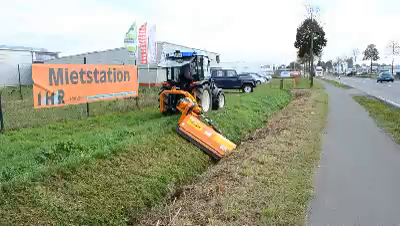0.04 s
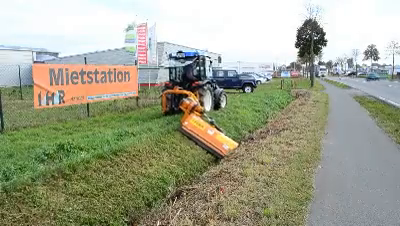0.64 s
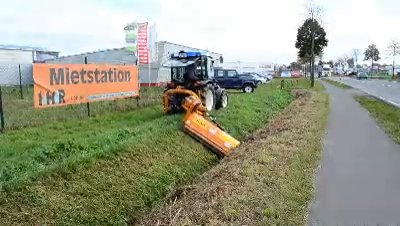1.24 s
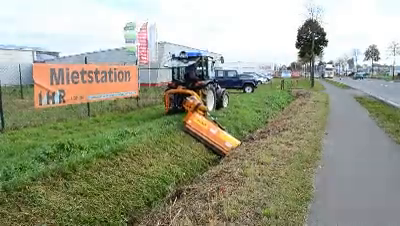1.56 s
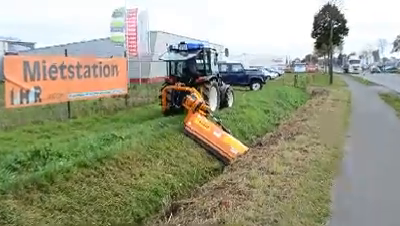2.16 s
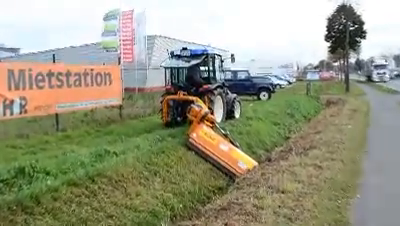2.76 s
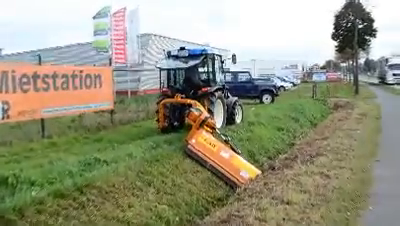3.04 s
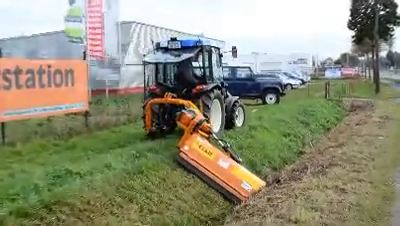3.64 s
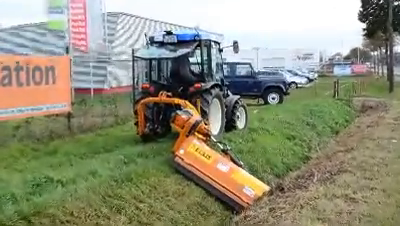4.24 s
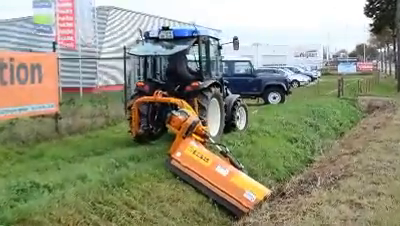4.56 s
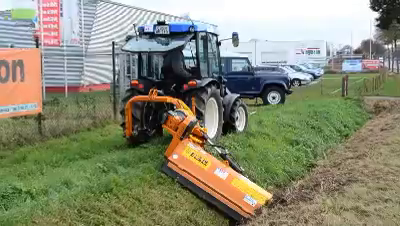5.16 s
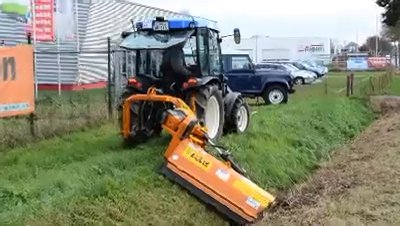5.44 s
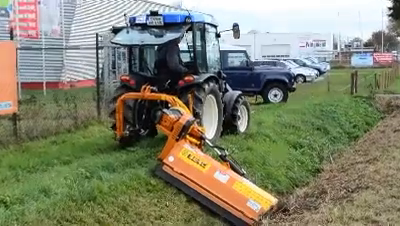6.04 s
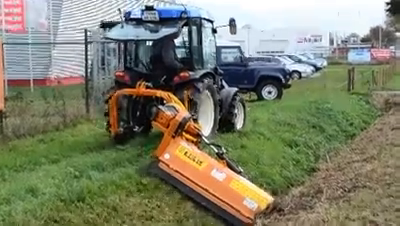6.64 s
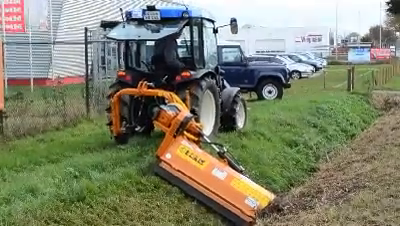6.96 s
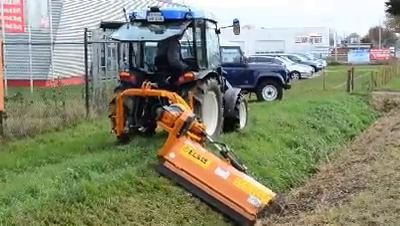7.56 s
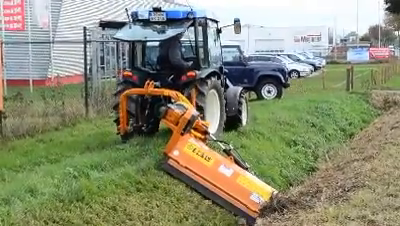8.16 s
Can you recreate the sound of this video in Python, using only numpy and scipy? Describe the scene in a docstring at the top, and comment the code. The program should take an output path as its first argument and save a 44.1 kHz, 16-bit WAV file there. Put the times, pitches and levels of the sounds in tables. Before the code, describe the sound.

A diesel tractor driving a flail mower fades in during the first half second and runs at an almost constant speed throughout, outdoors beside a road. Its low, pulsing drone carries light engine clatter and a thin gear and pump whine. Cut grass hisses and crackles faintly, and twigs give small sharp snaps from about 0.7 to 6 seconds. From around 3 seconds several cars pass with soft swells of tyre noise. Light wind puffs on the microphone between 4 and 6 seconds, while stalks scrape faintly in the mower. From about 6.5 to 8 seconds a lorry passes, the loudest event, with tyre roar, rumble, and an exhaust note and whine that fall in pitch; the mower dips slightly beneath it. Around 8 seconds sticks and clods clatter briefly against the steel hood, with one more wind puff as the drone continues.

```python
"""A diesel tractor fades in, mowing a ditch with a flail mower at a governed, almost steady speed.
The rotor's drone beats against the engine, a pump and a gearbox whine, grass hisses and twigs snap.
From about 3 s cars pass on the road alongside; from 4 s a little wind puffs on the microphone.
Near 7 s a lorry goes by with tyre roar, exhaust and axle whine, and the gain control ducks the mower.
Around 8 s sticks and clods rattle through the steel hood."""
import sys
import numpy as np
from scipy import signal
from scipy.fft import rfft, irfft
from scipy.io import wavfile
from scipy.ndimage import uniform_filter1d, minimum_filter1d

SR = 44100
rng = np.random.default_rng(int(sys.argv[2]) if len(sys.argv) > 2 else 0)


def put_to_file(sound):
    """Save the sound as 16-bit audio at rate SR, in the file named by the first command-line argument."""
    columns = np.atleast_2d(sound).T  # one column per channel
    safe = np.clip(columns, -1, 1)
    whole_steps = np.round(safe * 32767)
    wavfile.write(sys.argv[1], SR, whole_steps.astype(np.int16))


N = 365588
T = np.arange(N) / SR


def amp(db):
    """Decibels to gain."""
    return 10 ** (np.asarray(db) / 20)


def unit(x):
    """Scales to rms 1."""
    return x / np.sqrt(np.mean(x ** 2) + 1e-20)


def curve(rows):
    """Interpolates (time_s, value) rows per sample."""
    return np.interp(T, *np.transpose(rows))


def colour(x, points):
    """Filters x by a (freq_hz, level_db) spectrum, rolling off past its ends; rms 1."""
    hz, db = np.transpose(points)
    log_f = np.log(np.fft.rfftfreq(len(x), 1 / SR) + 1)
    beyond = np.maximum(log_f - np.log(hz.max()), 0) + np.maximum(np.log(hz.min()) - log_f, 0)
    gain = amp(np.interp(log_f, np.log(hz), db) - 20 * beyond)
    return unit(irfft(rfft(x) * gain, len(x)))


def noise(size=N):
    """White noise."""
    return rng.standard_normal(size)


def wander(rate_hz):
    """Random drift of rms 1, low-passed at rate_hz."""
    size = 2048
    freq_hz = np.fft.rfftfreq(size, T[-1] / size)
    slow = irfft(rfft(noise(size)) / (1 + (freq_hz / rate_hz) ** 4))
    return np.interp(T, np.linspace(0, T[-1], size), unit(slow))


def grains(per_s, spread_db):
    """Random impacts of unequal size; rms 1."""
    size = amp(spread_db * np.minimum(rng.exponential(1, N), 5))
    return unit(size * np.sign(noise()) * (rng.random(N) < per_s / SR))


def hump(centre_s, half_s):
    """Gaussian rise and fall of height 1."""
    return np.exp(-((T - centre_s) / half_s) ** 2)


def swells(rows):
    """Joint gain of (centre_s, half_s, level_db) humps, summed in power."""
    return np.sqrt(sum((amp(db) * hump(s, half_s)) ** 2 for s, half_s, db in rows))


def partials(turns, orders, waver, waver_hz):
    """(order, level_db) tones of a turning part, each wavering in level and phase."""
    out = np.zeros(N)
    for order, db in orders:
        phase = 2 * np.pi * (order * turns + rng.random())
        in_phase = np.cos(phase) * (1 + waver * wander(waver_hz))
        quadrature = np.sin(phase) * waver * wander(waver_hz)
        out += amp(db) * unit(in_phase + quadrature)
    return out


def shaft_turns(hz):
    """Revolutions of a shaft; all shafts follow one governed speed."""
    speed = [(.6, 1.0115), (1.05, .9985), (3.2, .9951), (3.9, .9988), (4.45, .9983), (5.1, .9945),
             (6.3, .9967), (7.4, .9972), (8.0, .994)]  # time_s, speed_factor
    return hz * np.cumsum(curve(speed)) / SR


def doppler_turns(hz, closest_s, pass_s, mach):
    """Cycles heard from a passing tone: sharp as it comes, flat as it goes."""
    receding = (T - closest_s) / np.hypot(pass_s, T - closest_s)
    return np.cumsum(hz * (1 - mach * receding)) / SR


def passing(peak_s, pass_s, db):
    """Gain of a passing source; in pass_s it travels as far as the road is from the microphone."""
    fall_db_per_decade = 41
    distance = np.hypot(1, (T - peak_s) / pass_s)
    return amp(db - fall_db_per_decade * np.log10(distance))


def wind():
    """Lumpy low buffeting of the microphone, in a few puffs."""
    gusts = [(4.15, 0.33, -32), (4.88, 0.11, -27.5), (5.33, .1, -30), (5.95, .25, -35), (8.22, 0.072, -25)]  # centre_s, half_s, level_db
    buffet_spectrum = [(20, -22), (50, -11), (100, -6.5), (190, -3.5), (300, -9.5), (500, -22.5),
                       (1200, -45)]  # freq_hz, level_db
    return swells(gusts) * amp(5.2 * wander(17)) * colour(noise(), buffet_spectrum)


def tyres():
    """Tyre roar swells as each vehicle passes; tread hiss is thrown ahead of it."""
    passes = [(2.82, 0.29, -26, -34), (3.37, 0.26, -28.5, -41), (4.15, 0.63, -28, -31),
              (5.08, 0.41, -25, -33), (5.42, 0.18, -21, -31), (6.38, 0.17, -28, -23),
              (6.8, 0.4, -11.5, -19), (7.38, 0.37, -8.5, -25), (7.87, 0.12, -16, -34)]  # cars, then lorry axles: closest_s, pass_s, roar_db, tread_db
    roar_spectrum = [(40, -18), (100, -10), (200, -4), (420, -8.5), (600, -4), (800, 0), (1020, -1),
                     (1250, -7), (1600, -13), (2000, -20.5), (3000, -27.5), (4200, -35), (6000, -54),
                     (12000, -62)]  # freq_hz, level_db
    tread_spectrum = [(800, -24), (1150, 0), (1330, -2), (1550, -6), (1850, -15.5), (2300, -19),
                      (3500, -35)]  # freq_hz, level_db
    lead = 0.3  # share of pass_s
    roar = np.sqrt(sum(passing(s, pass_s, db) ** 2 for s, pass_s, db, _ in passes))
    tread = np.sqrt(sum(passing(s - lead * pass_s, pass_s, db) ** 2 for s, pass_s, _, db in passes))
    flutter = amp(wander(20))
    return flutter * (roar * colour(noise(), roar_spectrum) + tread * colour(noise(), tread_spectrum))


def car():
    """One car's exhaust note swells and drops in pitch going past."""
    closest_s, pass_s = 3.35, 0.56
    firing = doppler_turns(58, closest_s, pass_s, mach=0.04)
    return passing(closest_s, pass_s, db=-43.5) * partials(firing, [(1, 0)], waver=0.2, waver_hz=4)


def lorry():
    """Exhaust and rear-axle whine fall in pitch over a rumble; each faces the microphone in turn."""
    whine_surges = [(2, 6.64, 0.23, -17), (2, 7.03, 0.14, -11.5), (2, 7.48, .5, -21.5), (3, 6.78, 0.2, -16)]  # axle_order, peak_s, pass_s, level_db
    exhaust_orders = [(1, 2), (2, -12.5), (5, -5.5)]
    body_spectrum = [(60, -16.5), (200, -6.5), (285, 4), (400, -4.5), (550, -19), (1000, -27)]
    firing_hz, closest_s, pass_s, mach = 54.3, 7.03, 0.2, 0.045
    axle_ratio, axle_lag_s = 5.61, 0.05
    firing = doppler_turns(firing_hz, closest_s, pass_s, mach)
    axle = doppler_turns(axle_ratio * firing_hz, closest_s + axle_lag_s, pass_s, mach)
    exhaust = partials(firing, exhaust_orders, waver=0.32, waver_hz=2.5)
    exhaust *= passing(peak_s=6.96, pass_s=0.45, db=-17.5)
    whine = sum(passing(*surge) * partials(axle, [(order, 0)], waver=0.49, waver_hz=21)
                for order, *surge in whine_surges)
    body = passing(peak_s=6.72, pass_s=0.39, db=-17) * colour(noise(), body_spectrum)
    return exhaust + whine + body


def drive_line():
    """Hydraulic pump and gearbox whine; the gearbox fades twice."""
    pump_orders = [(5, -41), (6, -47), (7, -51), (8, -56), (10, -53), (11, -66.5)]  # order, level_db
    gear_orders = [(1, -37.5), (2, -39.5)]  # order, level_db
    gear_fades = [(2.202, 0.47, -7.5), (4.85, 0.66, -7)]  # centre_s, half_s, gain_db
    pump_hz, gear_hz = 307.1, 366.7
    pump = partials(shaft_turns(pump_hz), pump_orders, waver=0.42, waver_hz=3.5)
    gear = partials(shaft_turns(gear_hz), gear_orders, waver=0.15, waver_hz=2.3)
    gear_db = 0.57 + sum(db * hump(s, half_s) for s, half_s, db in gear_fades)
    return pump + amp(gear_db) * gear


def engine():
    """Four-cylinder diesel: its two-turn cycle gives half orders and a repeating clatter."""
    exhaust_orders = [(2, -36), (3, -38), (4, -26.5), (11, -49.5), (17.5, -49.5), (18.5, -45.5),
                      (22, -44.5), (23, -43.5), (31.5, -43), (44.5, -47.5), (50.5, -48.5), (52.5, -51)]  # crank_order, level_db
    block_spectrum = [(250, -41), (410, -9), (470, -1.5), (610, 3.5), (730, -1), (820, -2), (910, 0),
                      (1000, -5.5), (1300, -4), (1800, -7), (2500, -14), (3300, -18.5), (4400, -29.5),
                      (6500, -44.5)]  # freq_hz, level_db
    crank_hz = 40.08
    crank = shaft_turns(crank_hz)
    low = partials(crank, exhaust_orders[:3], waver=0.083, waver_hz=2.6)
    high = partials(crank, exhaust_orders[3:], waver=0.38, waver_hz=1.8)
    cycle_samples = round(2 * SR / crank_hz)
    pattern = np.interp(crank / 2 % 1 * cycle_samples, np.arange(cycle_samples), noise(cycle_samples))
    knock = 1 + 0.15 * np.exp(-(2 * crank % 1) / 0.19)  # louder just after each firing
    clatter = colour(knock * (0.33 * unit(pattern) + noise()), block_spectrum)
    return low + high + amp(-27) * clatter


def grass():
    """Blades shred in a fizz and stalks crackle, louder as each tuft is drawn in."""
    tufts = [(.69, .07, -56, -59), (1.52, .1, -61, -63), (2.6, 0.18, -62, -60), (4.198, 0.038, -63, -53),
             (4.36, 0.083, -53, -49), (4.6, 0.086, -58, -51), (5.078, 0.33, -51.5, -48.5),
             (5.988, .09, -57, -49), (6.36, 0.19, -52, -56), (6.692, 0.32, -46, -54),
             (7.998, 0.35, -61, -56)]  # centre_s, half_s, blade_db, stalk_db
    blade_spectrum = [(1500, -23), (3300, -7), (5000, 1), (6200, -2.5), (8000, -2.5), (11000, -1.5),
                      (12300, -4.5), (13500, -13.5), (15500, -24)]  # freq_hz, level_db
    stalk_spectrum = [(1500, -14), (3000, -7), (4500, 10.5), (6000, -3), (9000, -3.5), (12000, -6.5),
                      (15500, -23)]  # freq_hz, level_db
    thin_grass_db = -58
    blades = np.hypot(amp(thin_grass_db), swells([(s, half_s, db) for s, half_s, db, _ in tufts]))
    stalks = np.hypot(amp(thin_grass_db), swells([(s, half_s, db) for s, half_s, _, db in tufts]))
    fizz = amp(-0.5) * blades * colour(noise(), blade_spectrum)
    crackle = stalks * colour(grains(per_s=440, spread_db=3.5), stalk_spectrum)
    return amp(2.1 * wander(35)) * (fizz + crackle)


def scour():
    """A stretch of thick stalks scours the hood, which rings thinly."""
    ring_spectrum = [(3050, -10), (3350, -2), (3560, -1), (3850, -19.5)]
    centre_s, half_s, level_db = 5.1, 1.0, -46.5
    plateau = np.exp(-((T - centre_s) / half_s) ** 6)
    return plateau * amp(level_db + 2.5 * wander(11)) * colour(noise(), ring_spectrum)


def twigs():
    """Each twig gives a bright snap of about a millisecond; the flail that hit it rings briefly."""
    hits = [(0.702, -41, 14), (0.7327, -43, 4.0), (1.111, -36, 10), (1.7643, -36, 11.5), (1.8987, -39, 15),
            (1.9749, -32, -4), (2.108, -39.5, 12), (2.2283, -41, 11), (2.7367, -32, 6), (2.7681, -43, 2),
            (2.959, -31.5, 8.5), (3.2794, -31, 10), (3.4416, -35, 11.5), (3.525, -30, 9), (3.7733, -43, 12),
            (3.8786, -43, 7), (4.054, -34, -1), (4.1594, -41, 14), (4.8075, -36.5, 5), (6.1928, -38, -4),
            (6.2347, -33, 5)]  # start_s, level_db, ring_re_snap_db
    flail_modes = [(3000, 6.5, 0.0088), (3540, 5, 0.0083), (4130, -2.5, 0.015), (5500, -18, 0.0063)]  # pitch_hz, level_db, t60_s
    snap_spectrum = [(3000, 0), (5500, -4), (8000, -5.5), (11500, -13), (13200, -9), (15500, -23)]
    out, t = np.zeros(N + SR), np.arange(1024) / SR
    envelope = (1 - np.exp(-t / 0.0004)) * (np.exp(-t / 0.0008) + 0.046 * np.exp(-t / 0.0063))
    envelope /= envelope.max()
    envelope_rms = np.sqrt(np.mean(envelope ** 2))
    ring_attack = 1 - np.exp(-t / 0.00053)
    for start_s, db, ring_db in hits:
        snap = envelope * colour(noise(len(t)), snap_spectrum)
        ring = sum(amp(mode_db - 60 * t / t60_s) * np.sin(2 * np.pi * hz * rng.uniform(0.92, 1.04) * t)
                   for hz, mode_db, t60_s in flail_modes)
        burst = unit(snap) + amp(ring_db) * unit(ring * ring_attack)
        out[round(start_s * SR):][:len(t)] += amp(db) * envelope_rms * burst
    return out[:N]


def rattles():
    """Sticks and clods flung against the hood: a short steel clatter over a dull knock."""
    hits = [(7.951, -29, 0.0082, 700, -40), (7.9905, -15.5, 0.0045, 250, -19),
            (8.127, -22.5, 0.0085, 337, -20), (8.147, -28, 0.011, 550, -26),
            (8.187, -53, 0.014, 215, -13.5)]  # centre_s, clatter_db, decay_s, knock_hz, knock_db
    steel_spectrum = [(500, -16), (1200, -5), (2000, 12), (2400, 3), (2900, 7), (3300, -2), (3800, 0),
                      (5200, -12), (8000, -19.5), (12000, -22), (15500, -34)]  # freq_hz, level_db
    out, t = np.zeros(N + SR), np.arange(-4096, 4096) / SR
    for centre_s, clatter_db, decay_s, knock_hz, knock_db in hits:
        knock_spectrum = [(knock_hz / 2, -14), (knock_hz, 0), (knock_hz * 2, -12), (knock_hz * 4, -26)]
        clatter = colour(noise(len(t)), steel_spectrum) * np.exp(-abs(t) / decay_s)
        knock = colour(noise(len(t)), knock_spectrum) * np.exp(-(t / (1.8 * decay_s)) ** 2)
        start = round(centre_s * SR) - len(t) // 2
        out[start:][:len(t)] += amp(clatter_db) * clatter + amp(knock_db) * knock
    return out[:N]


def rotor():
    """Rows of flails drone past the hood's edge and churn the air under it."""
    rotor_orders = [(2, -52), (3, -50), (5, -40), (6, -43), (7, -49), (8, -33.5), (9, -46.5), (16, -49.5),
                    (20, -42.5), (22, -48)]  # order, level_db
    churn_spectrum = [(30, -31), (60, -7), (110, -3.5), (180, -1), (260, -4), (330, -5.5), (400, -17),
                      (600, -24), (1200, -52)]  # freq_hz, level_db
    rotor_hz, flail_rows, drone_db, churn_db = 34.25, 4, -16, -30.5
    turns = shaft_turns(rotor_hz)
    drone = amp(drone_db + 0.57 * wander(6)) * np.sqrt(2) * np.cos(2 * np.pi * flail_rows * turns)
    churn = amp(churn_db) * colour(noise(), churn_spectrum)
    return drone + churn + partials(turns, rotor_orders, waver=0.28, waver_hz=2.8)


def gain_control(x):
    """Turns everything down while the smoothed power is over the threshold."""
    threshold_db, ratio, response_s, output_db = -14, 2.5, 0.048, -2
    pole = np.exp(-1 / (response_s * SR))
    power_db = 10 * np.log10(signal.lfilter([1 - pole], [1, -pole], x ** 2) + 1e-12)
    return x * amp(output_db - np.maximum(power_db - threshold_db, 0) * (1 - 1 / ratio))


def limiter(x, ceiling):
    """Holds peaks to the ceiling with a gain smoothed over 10 ms."""
    allowed = ceiling / np.maximum(abs(x), ceiling)
    return x * uniform_filter1d(minimum_filter1d(allowed, size=441), size=441)


def scene():
    """The tractor at work beside the road; mono."""
    tractor_level = [(.5, .5), (1.9, 1.5), (2.6, 0), (3.9, 0.5), (5.0, 1), (6.4, 3.5), (8.29, 2.5)]  # time_s, gain_db
    tractor = amp(curve(tractor_level)) * (engine() + drive_line())
    mower = rotor() + grass() + scour() + twigs() + rattles()
    traffic = tyres() + lorry() + car()
    return (tractor + mower + traffic + wind())[None]


def record(dry):
    """Gain control, fade-in, limiter, low-pass."""
    fade_start_s, fade_s, fade_db, cutoff_hz = 0.1, 0.44, -33.5, 15800
    progress = np.clip((T - fade_start_s) / fade_s, 0, 1)
    fade = (progress > 0) * amp(fade_db * np.cos(np.pi / 2 * progress) ** 2)
    limited = limiter(gain_control(dry[0]) * fade, ceiling=0.6)
    low_pass = signal.firwin(511, cutoff_hz, window=("kaiser", 9), fs=SR)
    return signal.oaconvolve(limited, low_pass, "same")[None]


dry = scene()
out = record(dry)
put_to_file(out)
```